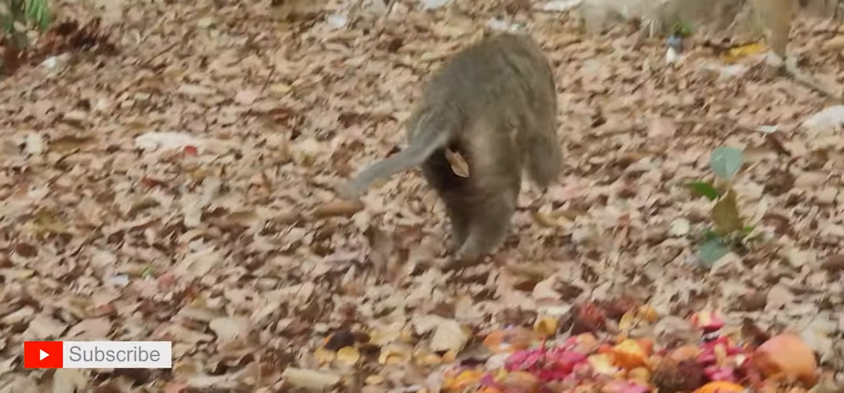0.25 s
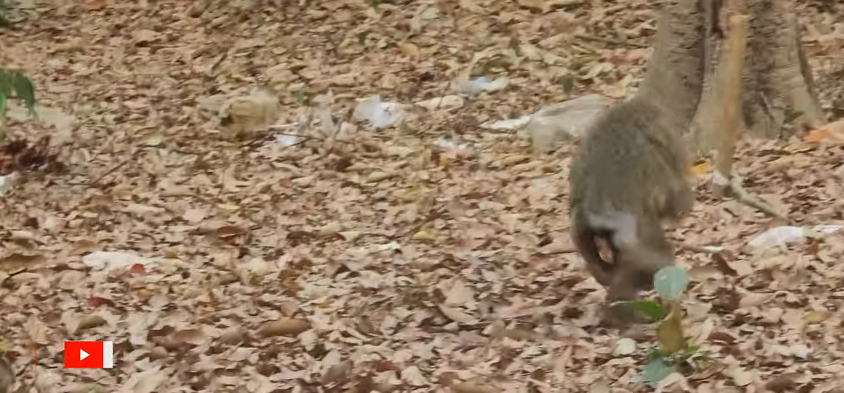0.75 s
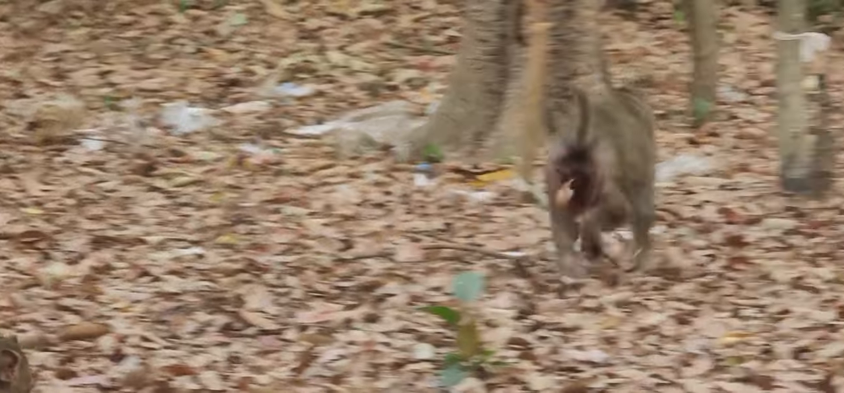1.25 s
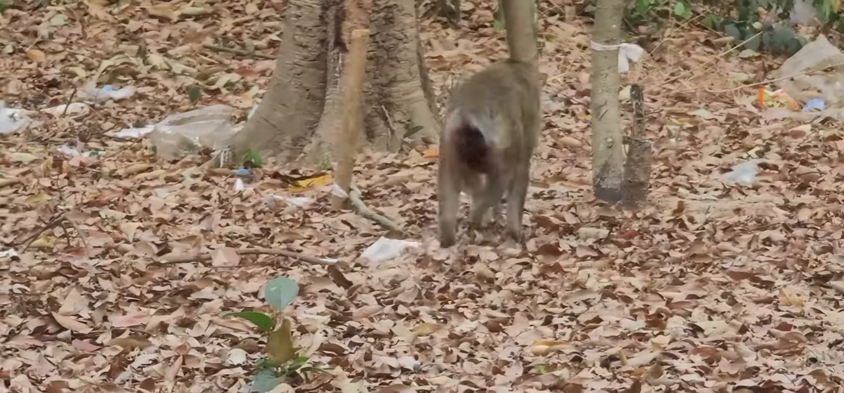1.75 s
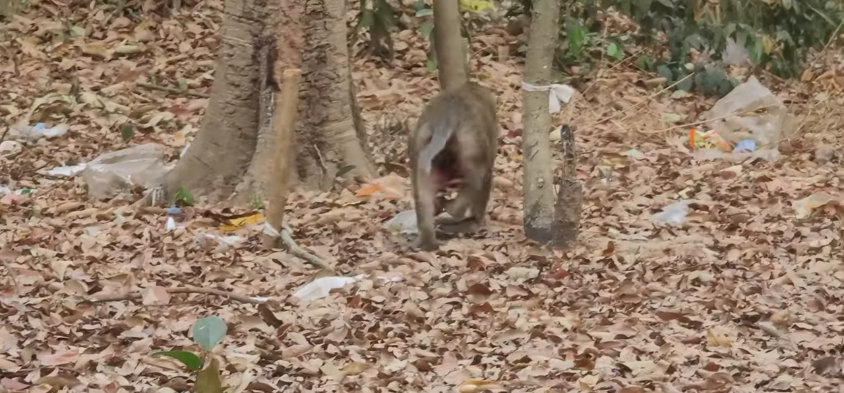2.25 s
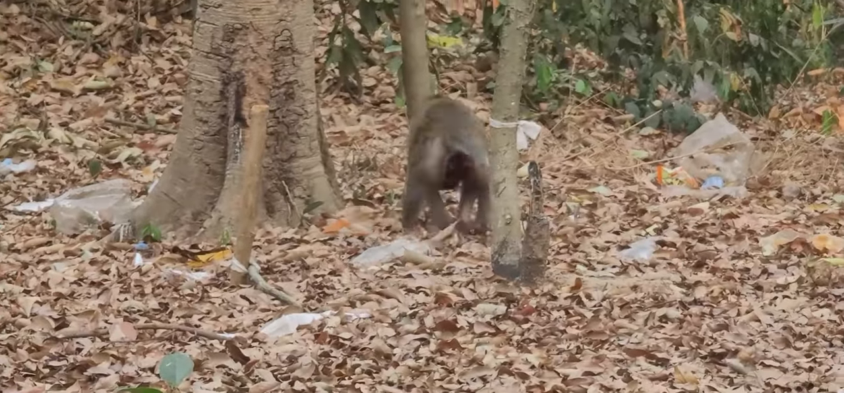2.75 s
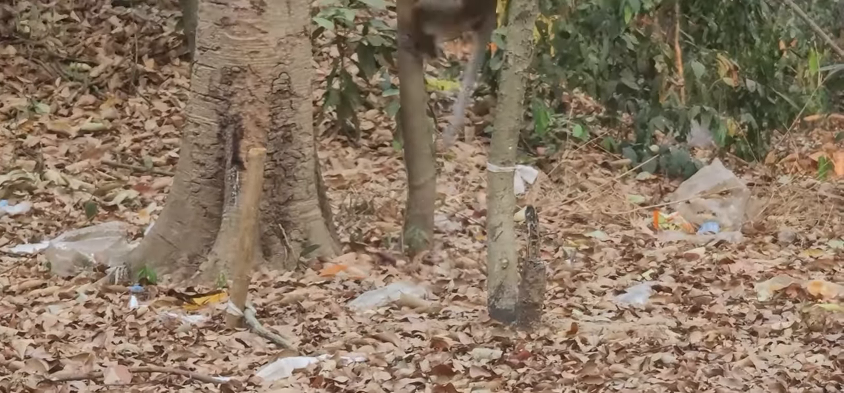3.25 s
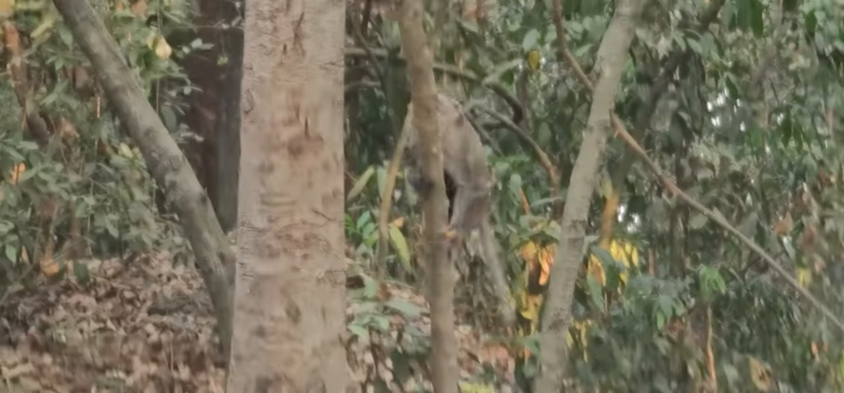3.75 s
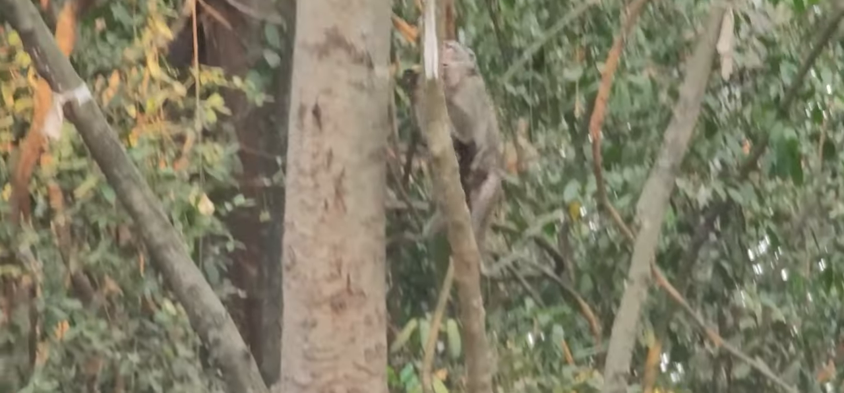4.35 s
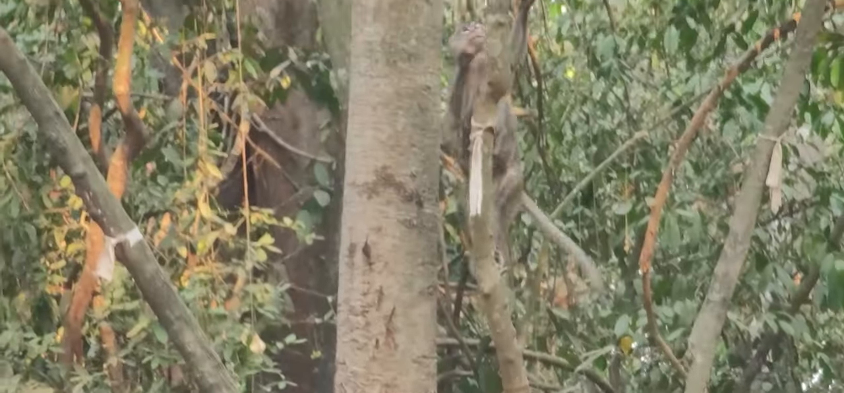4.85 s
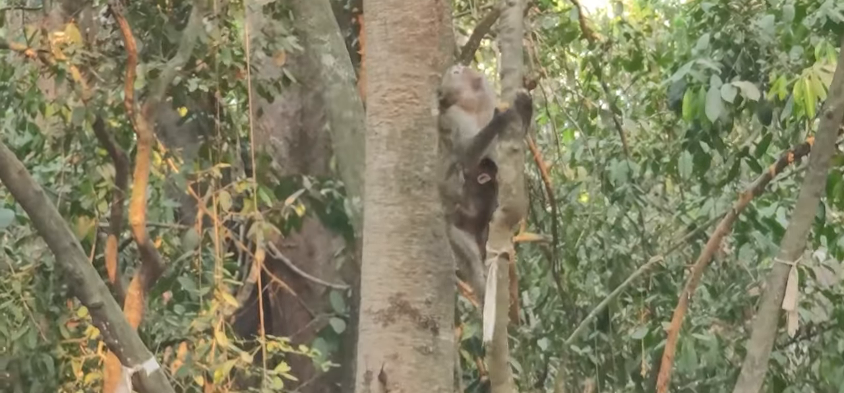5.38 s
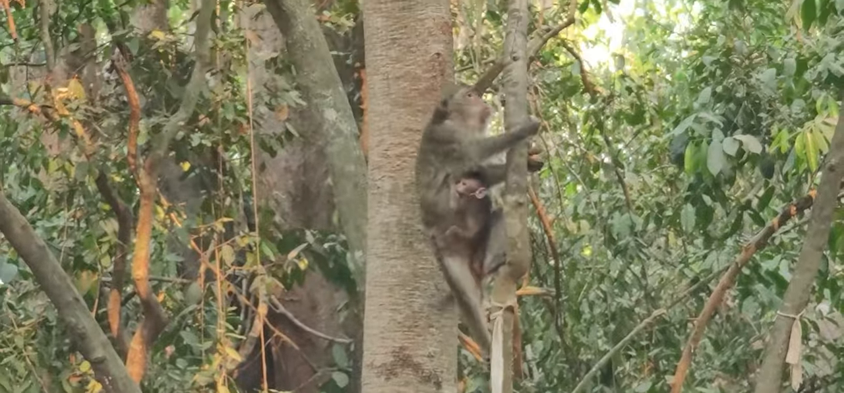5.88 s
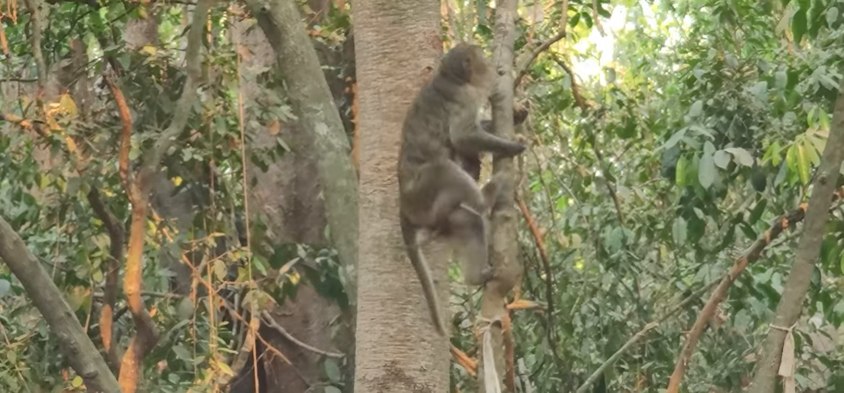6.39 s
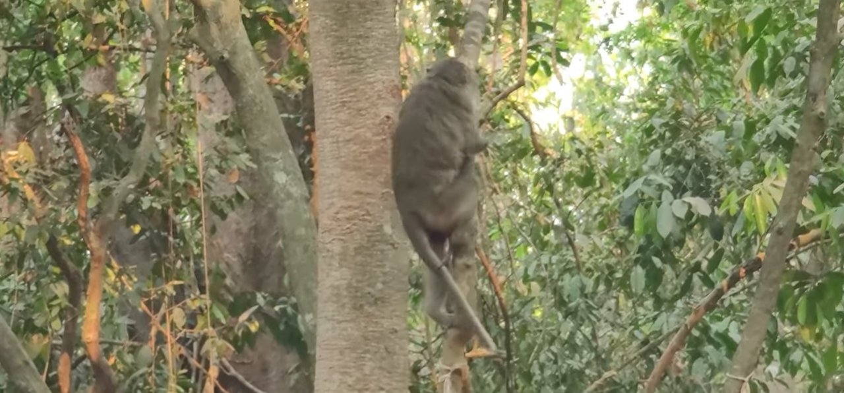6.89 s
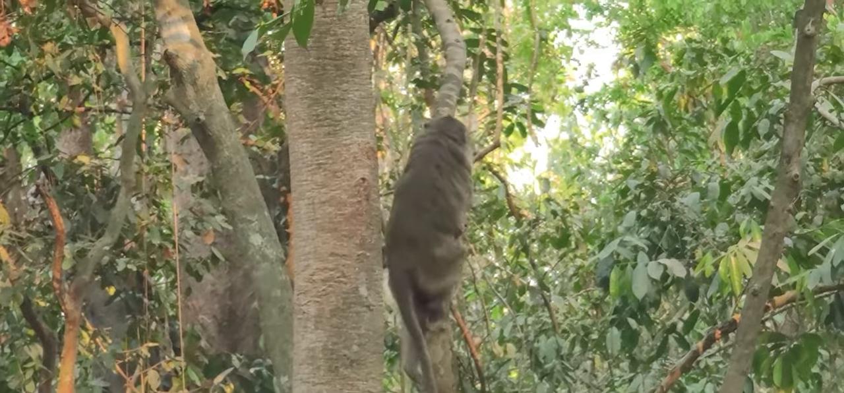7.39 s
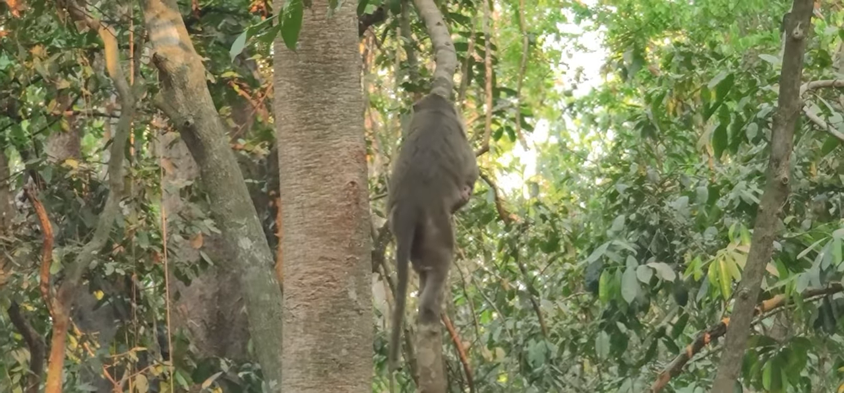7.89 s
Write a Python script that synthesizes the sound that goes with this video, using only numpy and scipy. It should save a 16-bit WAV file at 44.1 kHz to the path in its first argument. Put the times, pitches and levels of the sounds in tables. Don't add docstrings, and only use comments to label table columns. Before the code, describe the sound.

Loud cicadas hiss steadily in a dry forest while an engine drones, leaves crunch, a dog barks far off and sharp taps hit the phone.

```python
import sys
import numpy as np
from scipy import signal
from scipy.fft import rfft, irfft, next_fast_len
from scipy.io import wavfile
from scipy.ndimage import uniform_filter1d, minimum_filter1d, map_coordinates

SR = 44100
rng = np.random.default_rng(int(sys.argv[2]) if len(sys.argv) > 2 else 0)


def put_to_file(sound):
    columns = np.atleast_2d(sound).T
    safe = np.clip(columns, -1, 1)
    whole_steps = np.round(safe * 32767)
    wavfile.write(sys.argv[1], SR, whole_steps.astype(np.int16))


def decibels_to_gain(level_db):
    exponent = np.asarray(level_db, float) / 20
    return 10 ** exponent


N = 358533

# time in seconds, level in dB, turn of the phone up to the canopy from 0 to 1.
CHORUS = [
    (0, -16, 0),
    (2.2, -16.5, -.2),
    (4.4, -16.5, 0),
    (5.2, -16, 0.02),
    (6.2, -16, 0.43),
    (7.3, -15.5, 1),
    (8.13, -15.5, 1),
]
# frequency in Hz, density in dB per Hz.
LEFT_PORT = [(3850, -23.0), (4550, -17.6), (5150, -8.1), (5800, -10.7), (6250, -6.5), (6700, -7.6),
             (7050, -5.7), (8250, -10.1), (8850, -16.9), (9200, -23.7), (10400, -28.0), (11100, -34.3),
             (12200, -36.4), (14700, -29.9)]
RIGHT_PORT = [(3850, -21.0), (4550, -12.8), (5050, -3.6), (5800, -2.8), (6230, 0.1), (6500, -4.4),
              (7200, -11.3), (7650, -20.1), (8300, -19.7), (8900, -17.3), (10300, -20.6), (11100, -30.3),
              (12200, -37.0), (14700, -31.0)]
# frequency in Hz, gain in dB.
SONG_EDGE = [(2400, -20.6), (2900, -16.5), (3450, -9.7), (3850, 0.0)]
SONG_TOP = [(12200, 0), (12600, 1), (13600, -2), (14100, 0), (14700, 0), (15700, -2)]
# centre in Hz, width in Hz, gain in dB.
SOLOS = [(5300, 220, .8), (6150, 200, 1.2), (7050, 70, 2.5)]
# time in seconds, level in dB.
FOREST = [(0, 5), (.6, -1.5), (.9, 2.5), (2, -0.7), (2.45, 2), (3.5, -0.1), (3.95, -3), (5.3, -1.5),
          (5.8, 2), (6.1, -2.5), (8.13, -2)]
# frequency in Hz, density in dB per Hz.
MURMUR = [(140, -20.5), (230, -1.5), (468, -10), (693, -4.5), (765, -2), (1190, -7), (1400, -19),
          (1820, -16), (3080, -120)]
LEAVES = [(650, -16), (1100, 1), (1770, -4), (1970, -0.5), (2520, -8.5), (3000, -3.5), (3900, -15.5),
          (6600, -120)]
RUMBLE = [(12, -41), (20, -7), (38, -10), (60, 1), (113, -2), (156, -3.5), (242, -23), (320, -37),
          (420, -67), (700, -120)]
# time in seconds, second order in Hz.
ENGINE = [
    (0, 64.5),
    (.25, 67.9),
    (1.15, 68),
    (2.7, 71.8),
    (4.32, 73.5),
    (4.5, 53),
    (8.13, 53),
]
# multiple of the firing cycle, level in dB.
ORDERS_DB = [(1, -27), (2, 2.5), (3, -3.5), (4, -7), (5, -11.5)]
# start in seconds, peak in dB, pitch in Hz.
TWIGS = [(0.034, -29, 614), (0.343, -41, 3200), (0.594, -43, 2270), (0.783, -36, 2100), (1.197, -41, 2160),
         (1.587, -36, 802), (1.871, -39, 635), (5.859, -41, 853), (6.858, -50, 894), (6.892, -47, 1800),
         (7.071, -42, 3180), (7.314, -40, 2210)]
# start in seconds, peak in dB, length in seconds.
BARKS = [
    (0.107, -38, 0.063),
    (0.733, -38.5, 0.039),
    (1.492, -35, 0.042),
    (2.205, -37, 0.053),
    (2.961, -34, 0.036),
]
# centre in Hz, width in Hz, level in dB.
THROAT = [(441, 140, -2.5), (664, 120, 8.5), (787, 280, 5), (1290, 240, 2.5), (1970, 260, -3)]
# start in seconds, length in seconds, pitch in Hz, glide in Hz, level in dB.
COOS = [
    (3.23, 0.11, 720, 91, -57),
    (3.33, 0.066, 800, 41, -61),
    (3.585, 0.15, 1090, -20, -58.5),
    (3.7, 0.074, 802, -19, -57),
    (4.551, 0.28, 1204, 54, -60),
    (4.821, 0.28, 1205, -18, -63),
    (5.36, .66, 498, -4, -67.5),
    (5.76, 0.12, 818, 82, -53.5),
]
# start in seconds, peak in dB, thump in Hz, case ring in Hz, leak to the left port in dB.
TAPS = [
    (3.505, -46, 75.4, 1060, -13),
    (3.538, -22.5, 96, 1130, -33),
    (5.2252, -23.5, 169.4, 1180, -29),
    (5.643, -26, 66, 1540, -28),
    (6.3375, -25.5, 261, 1093, -17),
]
# frequency in Hz, t60 in seconds.
TREES = [(300, 0.53), (1300, 0.91), (3000, .6), (8000, 0.52)]

PORT_GAP_S = .162 / 343


def unit(x):
    return x / np.sqrt(np.mean(x ** 2) + 1e-20)


def along(points, hz):
    f, v = np.transpose(points)
    return np.interp(np.log(hz + 1), np.log(f + 1), v)


def curves(rows):
    s, *cols = np.transpose(rows)
    return [np.interp(np.arange(N) / SR, s, c) for c in cols]


def wobble(rate_hz, at=None):
    at = np.arange(N) if at is None else at
    knots = rng.standard_normal(int(N * rate_hz / SR) + 4)
    return map_coordinates(knots, [at * rate_hz / SR])


def filtered(x, response):
    m = next_fast_len(N + SR // 4)
    return irfft(rfft(x, m) * response(np.fft.rfftfreq(m, 1 / SR)), m)[..., :N]


def clicks(count, rate_hz):
    pair = np.zeros((2, N + 100))
    for pace, bearing in rng.random((count, 2)):
        jitter = 1 + .12 * rng.standard_normal(int(1.4 * rate_hz * N / SR))
        at = np.cumsum(SR / (rate_hz * (.7 + .6 * pace)) * jitter).astype(int)
        at = at[at < N]
        size = decibels_to_gain(2.9 * rng.standard_normal(len(at))) * rng.choice([-1, 1], len(at))
        lag = round(SR * PORT_GAP_S * np.sin(np.pi * (bearing ** .12 - .5)))
        pair += [np.bincount(at + 40, size, N + 100), np.bincount(at + 40 + lag, size, N + 100)]
    return unit(pair[:, :N])


def cicadas():
    lowest_turn_db, high_turn_db, top_turn_db = -2, 1.5, -0.2
    main_pan_turn_db, high_pan_turn_db = 0.9, 1.2
    level_db, turn = curves(CHORUS)
    turn = turn - turn.mean()
    field = 0.37 * clicks(count=24, rate_hz=320) + 0.91 * rng.standard_normal((2, N))

    def ports(hz):
        solo_db = sum(db * np.exp(-((hz - centre_hz) / width_hz) ** 2) for centre_hz, width_hz, db in SOLOS)
        port_db = [along(LEFT_PORT, hz), along(RIGHT_PORT, hz)]
        song_db = along(SONG_EDGE + SONG_TOP, hz)
        return decibels_to_gain(port_db + song_db + solo_db) / (1 + (2700 / (hz + 1)) ** 6)

    def above(x, edge_hz):
        return filtered(x, lambda hz: 1 / (1 + (edge_hz / (hz + 1)) ** 12))

    sides = np.array([[.5], [-.5]])
    voices = filtered(field, ports)
    high, top = above(voices, 6800), above(voices, 11500)
    lowest = voices - above(voices, 4500)
    low = voices - high - lowest + lowest * decibels_to_gain(lowest_turn_db * turn + 0.57)
    low = low * decibels_to_gain(1.01 + sides * (main_pan_turn_db * turn - 1.04))
    high = (high - top) * decibels_to_gain((high_turn_db + sides * high_pan_turn_db) * turn)
    top = top * decibels_to_gain(top_turn_db * turn + 0.35 * wobble(11.0))
    return (low + high + top) * decibels_to_gain(level_db + 4.0) / np.std(voices)


def surround(pair):
    bearings = np.linspace(0, np.pi / 2, 12)[:, None]
    grid_hz = np.arange(0, SR / 2, 20)
    likeness = np.cos(2 * np.pi * grid_hz * PORT_GAP_S * np.sin(bearings)).mean(axis=0)
    turn = np.arccos(likeness) / 2

    def shares(hz):
        return np.array([np.interp(hz, grid_hz, np.cos(turn)), np.interp(hz, grid_hz, np.sin(turn))])

    mid, side = filtered(pair, shares)
    return np.array([mid + side, mid - side])


def rush(spectrum, patchy_db):
    z = signal.stft(rng.standard_normal((2, N)), nperseg=512)[2]
    patches = uniform_filter1d(rng.standard_normal(z.shape[1:]), size=8, axis=0)
    patches = uniform_filter1d(patches, size=10, axis=1)
    pair = signal.istft(z * decibels_to_gain(patchy_db * unit(patches)), nperseg=512)[1][:, :N]
    return unit(surround(filtered(pair, lambda hz: decibels_to_gain(along(spectrum, hz)))))


def forest():
    murmur_db, leaves_db, rumble_db, breeze_db = -56, -52, -43, -51
    breeze_rise_db_per_s = -0.1
    shared_db, = curves(FOREST)
    t = np.arange(N) / SR
    sway = wobble(9)
    murmur = decibels_to_gain(murmur_db + shared_db + 0.59 * sway) * rush(MURMUR, patchy_db=3.0)
    leaves = decibels_to_gain(leaves_db + shared_db + 0.5 * sway) * rush(LEAVES, patchy_db=2.2)
    rumble = decibels_to_gain(rumble_db + 2.2 * wobble(6) + np.array([[-.7], [.7]])) * rush(RUMBLE, patchy_db=0.5)
    gusts = rng.standard_normal((2, N))
    breeze = unit(filtered(gusts, lambda hz: decibels_to_gain(along(RUMBLE, hz)) / (1 + (hz / 90) ** 2)))
    breeze_db = breeze_db + breeze_rise_db_per_s * (t - t.mean()) + 3.8 * wobble(6.5)
    return murmur + leaves + rumble + decibels_to_gain(breeze_db + np.array([[-1.5], [1.5]])) * breeze


def engine():
    level_db, idle_drop_db = -41.5, 11.5
    pull_s, lift_s = 0.24, 4.34
    hz, = curves(ENGINE)
    t = np.arange(N) / SR
    cycle = np.cumsum(np.pi * hz / SR)
    load = np.clip(np.minimum(t / pull_s, (lift_s - t) / 0.041), 0, 1)
    db = level_db - idle_drop_db * (1 - load)
    out = np.zeros(N)
    for k, order_db in ORDERS_DB:
        unsteady_rad = (.5 + 1.54 * (1 - load)) * wobble(5.7)
        out += decibels_to_gain(db + order_db + 2.5 * wobble(7)) * np.sin(k * cycle + unsteady_rad)
    return out


def twigs():
    crunch_s, grain_db = .021, 3
    out = np.zeros((2, N + SR))
    for s, db, hz in TWIGS:
        t = np.arange(round(3 * crunch_s * SR)) / SR
        grains = unit(decibels_to_gain(grain_db * rng.standard_normal(len(t) // 64 + 1))).repeat(64)[:len(t)]
        swell = (t / crunch_s) * np.exp(1 - 3 * t / crunch_s)
        crunch = grains * rng.standard_normal((2, len(t))) * swell
        band = signal.butter(1, [hz / 1.84, hz * 1.67], "band", fs=SR)
        out[:, round((s - .003) * SR):][:, :len(t)] += decibels_to_gain(db + 18.0) * signal.lfilter(*band, crunch)
    return out[:, :N]


def resonances(modes):
    def response(f):
        return sum((-1) ** k * decibels_to_gain(db) * 1j * f * width / (centre * centre - f * f + 1j * f * width)
                   for k, (centre, width, db) in enumerate(modes))
    return response


def dog():
    bark_hz = 211.4
    folds = np.zeros(N)
    for s, db, length_s in BARKS:
        u = np.arange(round(length_s * SR)) / (length_s * SR)
        cycle = np.cumsum(bark_hz * (1.04 - 0.091 * u) / SR)
        pulses = np.diff(np.floor(cycle), prepend=0) + 0.088 * rng.standard_normal(len(u))
        folds[round((s - .008) * SR):][:len(u)] = decibels_to_gain(db + 29.0) * np.sin(np.pi * u ** .7) * pulses
    return filtered(folds, resonances(THROAT))


def monkeys():
    overtones_db, purer_db_per_s = -2.5, 43
    waver = .018
    calls = np.zeros(N)
    for s, length_s, hz, glide_hz, db in COOS:
        u = np.arange(round(length_s * SR)) / (length_s * SR)
        unsteady = 1 + waver * (hz / 1000) ** 3 * wobble(40.2, u * len(u))
        phase = np.cumsum(2 * np.pi * (hz + glide_hz * (u - .5)) * unsteady / SR)
        overtones = np.sin(2 * phase) + .8 * np.sin(3 * phase) + .4 * np.sin(4 * phase)
        tone = np.sin(phase) + decibels_to_gain(overtones_db - purer_db_per_s * length_s) * overtones
        calls[round(s * SR):][:len(u)] += decibels_to_gain(db + 7) * np.sin(np.pi * u) ** .6 * tone
    return calls * decibels_to_gain(2.5 * wobble(25))


def echoes(x):
    hz, t, z = signal.stft(rng.standard_normal((2, SR)), SR, nperseg=256)
    decay_db = -60 * t / along(TREES, hz)[:, None]
    tail = signal.istft(z * decibels_to_gain(decay_db), SR, nperseg=256)[1]
    return signal.fftconvolve(x, tail / np.linalg.norm(tail[0]), axes=1)[:, :N]


def taps():
    thump_level_db, thump_db_per_octave = 1, -8
    out = np.zeros((2, N + SR))
    t = np.arange(SR // 10) / SR
    for s, db, thump_hz, case_hz, leak_db in TAPS:
        thump_db = thump_level_db + thump_db_per_octave * np.log2(thump_hz / 80)
        click = 1.37 * np.sin(2 * np.pi * 3000 * t) * decibels_to_gain(-60 * t / 0.00092)
        click = click + .27 * np.sin(2 * np.pi * case_hz * t) * decibels_to_gain(-60 * t / 0.014)
        rattle = 0.16 * rng.standard_normal(len(t)) * decibels_to_gain(-60 * t / 0.14)
        thump = np.sin(2 * np.pi * thump_hz * t * (1.2 - 4.2 * t))
        thump = thump + 0.56 * np.sin(2 * np.pi * 45 * t) + 0.17 * np.sin(2 * np.pi * 230 * t)
        thump = thump * decibels_to_gain(thump_db - 60 * t / 0.0925) * (1 - np.exp(-t / 0.0035))
        port_db = db + 11.0 + np.array([[leak_db], [0]])
        out[:, round(s * SR):][:, :len(t)] += decibels_to_gain(port_db) * (click + rattle + thump)
    return filtered(out[:, :N], lambda hz: 1 + decibels_to_gain(4) * 1j * hz * 900 / (3500 ** 2 - hz ** 2 + 1j * hz * 900))


def scene():
    bark, coo = dog(), monkeys()
    far = decibels_to_gain(2.0) * echoes(np.roll(bark, 300)[None] + decibels_to_gain(-2.0) * coo[None])
    right_coo = decibels_to_gain(-3.5) * np.roll(coo, round(SR * PORT_GAP_S))
    direct = np.array([bark + coo, np.roll(bark, 9) + right_coo])
    return cicadas() + forest() + engine() + twigs() + direct + surround(far) + taps()


def low_pass(x):
    return signal.sosfilt(signal.butter(12, 17080, fs=SR, output="sos"), x)


def record(dry):
    top_hz = 15750
    need = np.minimum(1, .86 / (np.abs(dry).max(axis=0) + 1e-9))
    gain = uniform_filter1d(minimum_filter1d(need, size=301), size=301)
    mix = filtered(dry * gain, lambda hz: hz < top_hz)
    return low_pass(mix)


dry = scene()
out = record(dry)
put_to_file(out)
```